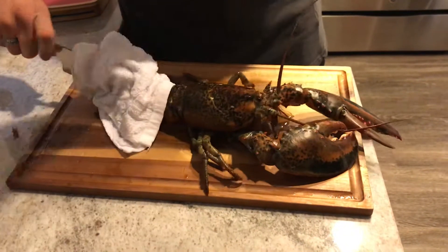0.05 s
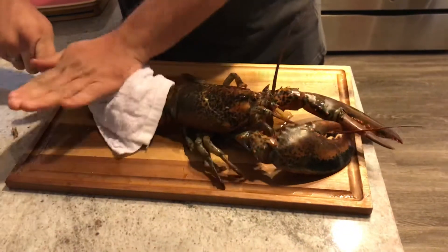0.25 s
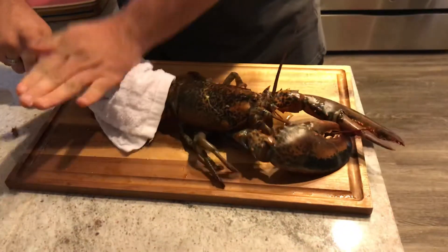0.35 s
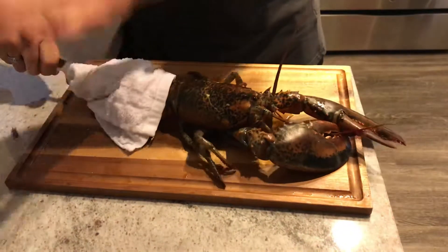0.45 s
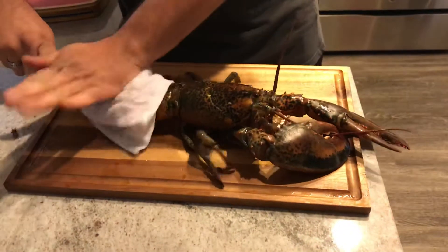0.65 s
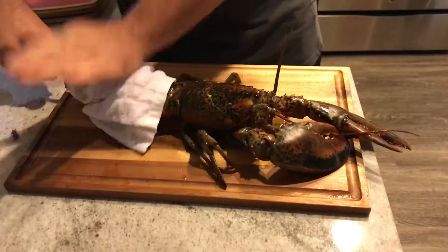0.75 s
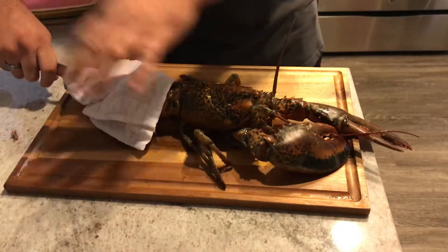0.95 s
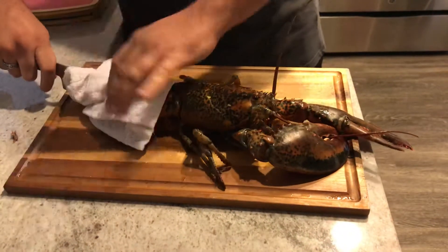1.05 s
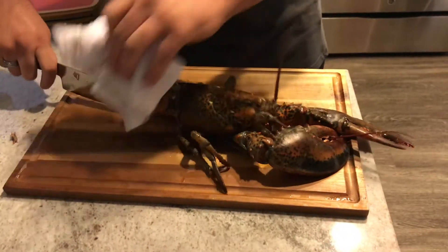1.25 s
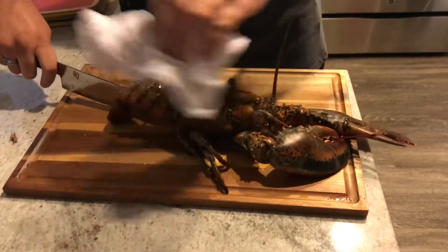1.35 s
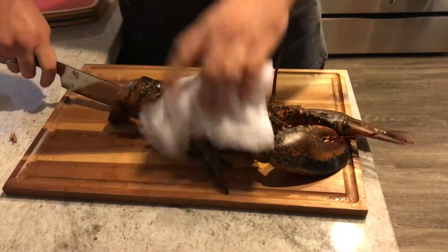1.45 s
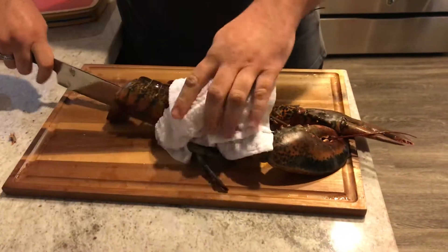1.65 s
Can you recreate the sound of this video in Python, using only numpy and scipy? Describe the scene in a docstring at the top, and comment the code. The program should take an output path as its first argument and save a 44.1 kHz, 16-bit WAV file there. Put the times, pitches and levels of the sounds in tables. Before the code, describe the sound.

Two sharp, crunching whacks drive a knife through lobster shell onto a wooden board.

```python
"""A palm twice whacks the back of a towel-covered knife, driving it through a lobster onto a board.
Each blow is a soft slap, a crunch of shell and a knock of wood; the second goes through and thumps
the counter harder. Then the towel is pulled off, and blade and shell tick.
The small kitchen echoes briefly over the low hum of an appliance."""
import sys
import numpy as np
from scipy import signal
from scipy.fft import rfft, irfft
from scipy.io import wavfile
from scipy.ndimage import uniform_filter1d

SR = 44100
rng = np.random.default_rng(int(sys.argv[2]) if len(sys.argv) > 2 else 0)


def wav_out(sig):
    """Save sig, one row per channel (or a flat mono array), as 16-bit PCM at SR to the path in sys.argv[1]."""
    wavfile.write(sys.argv[1], SR, np.round(np.clip(np.atleast_2d(sig).T, -1, 1) * 32767).astype(np.int16))


N = 74970
T = np.arange(N) / SR

# the blade drives into the board: (time [s], knock [dB], contact time [s], counter thump [dB])
KNOCKS = [(0.2331, -19, 0.00032, -36.5), (0.7091, -26.5, 0.00024, -25)]


def from_db(db):
    """Turn decibels into a number to multiply by."""
    return 10 ** (np.asarray(db) / 20)


def unit_power(x):
    """Scale a sound so that its average power is one."""
    return x / np.sqrt(np.mean(x ** 2) + 1e-20)


def at_hz(points, hz):
    """Read between the rows of a table, with octaves evenly spaced."""
    freqs, values = np.transpose(points)
    return np.interp(np.log(np.maximum(hz, 1)), np.log(freqs), values)


def colour(x, spectrum, tilt_db=0):
    """Even out a noise, then give it a tone colour; a positive tilt makes it brighter."""
    size, even_over_hz = 4096, 300
    hz = np.maximum(np.fft.rfftfreq(size, 1 / SR), 10)
    smoothed = uniform_filter1d(np.abs(rfft(x)) ** 2, int(even_over_hz * len(x) / SR))
    own_power = np.interp(hz, np.fft.rfftfreq(len(x), 1 / SR), smoothed)
    wanted_db = at_hz(spectrum, hz) + tilt_db * np.log2(np.maximum(hz, spectrum[1][0]))
    gain = from_db(wanted_db) / np.sqrt(own_power + 1e-12)
    # a minimum-phase filter, so nothing sounds ahead of a hit
    cepstrum = irfft(np.log(gain))
    cepstrum[1:size // 2] *= 2
    cepstrum[size // 2 + 1:] = 0
    return signal.fftconvolve(x, irfft(np.exp(rfft(cepstrum))))[:len(x)]


def bursts(events, spectrum, per_s, spread_db):
    """Each event is a swarm of tiny snaps that swells and dies away."""
    size = 24576
    out, age = np.zeros(N + size), np.arange(size) / SR
    for time, db, rise, decay, tilt_db in events:
        signs = rng.choice([-1, 1], size)
        strengths = signs * from_db(spread_db * np.minimum(rng.exponential(1, size), 4))
        snaps = (rng.random(size) < per_s / SR) * strengths
        swell = np.minimum(age / rise, 1) * np.exp(-np.clip((age - rise) / decay, 0, 20))
        burst = unit_power(colour(snaps * swell, spectrum, tilt_db))
        start = int(time * SR)
        out[start:start + size] += from_db(db) * np.sqrt(np.mean(swell ** 2)) * burst
    return out[:N]


def ring(tones, time, contact_s):
    """A struck object sounds its own tones; each falls by 60 dB over its ring time."""
    age = np.maximum(T - time, 0)
    out = sum((-1) ** k * from_db(db - 60 * age / ring_s) * np.sin(2 * np.pi * hz * age)
              for k, (hz, db, ring_s) in enumerate(tones))
    return out * (1 - np.exp(-age / contact_s))


def tap(tones, touches):
    """Light, hard touches set an object ringing."""
    return sum(from_db(db) * ring(tones, time, contact_s=0.00043) for time, db in touches)


def background():
    """Room air, the hum of an appliance and a thin hiss that fades out."""
    # hum tones, and the colours of hiss and air: (frequency [Hz], level [dB])
    hum_tones = [(59.2, -62), (174, -67.5), (355.5, -62.5)]
    hiss_colour = [(3500, -30), (4200, -2.5), (4550, -2.5), (5300, -31)]
    air_colour = [(15, -9.5), (25, -11), (76, 0), (123, -6), (200, -2.5), (309, -4), (363, -6), (489, -13),
                  (575, -14), (1190, -12.5), (1370, -17), (1560, -16.5), (2990, -22), (4370, -21.5),
                  (4870, -26.5), (11600, -33), (16000, -31)]
    hiss_db, hiss_fade_s, air_db = -67.5, 0.18, -57
    hum = sum(from_db(db) * np.sqrt(2) * np.sin(2 * np.pi * (hz * T + rng.random()))
              for hz, db in hum_tones)
    hiss = unit_power(colour(rng.standard_normal(N), hiss_colour)) * np.exp(-T / hiss_fade_s)
    air = unit_power(colour(rng.standard_normal(N), air_colour))
    return hum + from_db(hiss_db) * hiss + from_db(air_db) * air


def kitchen(x):
    """Sound bounces off counter and cupboards, then blurs into an echo that lasts longest in the bass."""
    # colours of the first bounces and of the echo's tail: (frequency [Hz], level [dB])
    early_colour = [(100, -9.5), (400, 5), (1200, 2), (5000, -4), (15000, -3)]
    tail_colour = [(60, -2), (150, 0), (300, 0), (600, -3.5), (1000, -6), (2000, -4), (4000, -6),
                   (6500, -11), (10000, -13), (15000, -15)]
    # how long the tail lasts: (frequency [Hz], ring time [s])
    ring_times = [(100, 0.65), (400, 0.46), (1200, 0.53), (3000, 0.38), (6000, 0.47), (10000, 0.36),
                  (15000, 0.44)]
    delay_s, build_s = 0.00075, 0.0024
    early_db, early_decay_s, early_per_s = -8.5, 0.022, 2500
    age = np.maximum(T - delay_s, 0)
    edges_hz = np.geomspace(45, 17000, 18)
    noise, response = rng.choice([-1., 1.], (2, N)), np.zeros(N)
    for k, (low, high) in enumerate(zip(edges_hz, edges_hz[1:])):
        hz = np.sqrt(low * high)
        band = signal.sosfilt(signal.butter(2, [low, high], "band", fs=SR, output="sos"), noise[k % 2])
        power = uniform_filter1d(band ** 2, int(SR * max(.006, 3 / (high - low))))
        steady = band / np.sqrt(np.abs(power) + 1e-12)
        tail = steady * from_db(-60 * age / at_hz(ring_times, hz)) * (1 - np.exp(-age / build_s))
        band_share = np.sqrt(2 * (high - low) / SR / N)
        response += from_db(at_hz(tail_colour, hz)) * unit_power(tail) * band_share
    bounces = rng.standard_normal(N) * (rng.random(N) < early_per_s / SR) * (age > 0)
    early = colour(bounces * np.exp(-age / early_decay_s), early_colour)
    response += from_db(early_db) * unit_power(early) / np.sqrt(N)
    return signal.fftconvolve(x, response)[:N]


def rubbing():
    """The towel slides, and loose shell scuffs on the board."""
    # each rub: (time [s], level [dB], rise [s], decay [s], tilt [dB/octave])
    rustles = [(.1, -61, 0.059, 0.013, 2), (.44, -57, 0.0074, 0.13, 3), (.93, -64.5, 0.1, 0.14, 14),
               (1.32, -53, 0.031, 0.037, 0), (1.395, -51, 0.049, 0.018, 1.9)]
    scuffs = [(1.273, -48, 0.015, 0.0085, 3), (1.34, -59, 0.013, 0.012, 7),
              (1.55, -52.5, 0.018, 0.0089, -1.5)]
    # their colours: (frequency [Hz], level [dB])
    cloth_colour = [(150, -7.5), (500, 4), (1000, 0), (2200, 6.5), (4000, -4.5), (8000, -6), (13000, -16.5),
                    (16000, -16)]
    scuff_colour = [(150, -21), (550, 5), (850, 3), (1100, 6), (1600, 1), (3000, -15), (8000, -12),
                    (15000, -28)]
    return sum(bursts(events, spectrum, per_s=6000, spread_db=3.5)
               for events, spectrum in [(rustles, cloth_colour), (scuffs, scuff_colour)])


def ticking():
    """Blade and shell tick, and the hollow tail snaps as the towel comes off."""
    # each click: (time [s], level [dB], rise [s], decay [s], tilt [dB/octave])
    ticks = [(.371, -36.5, 0.00023, 0.0022, 2), (.669, -45, 0.00057, 0.0097, 4),
             (1.209, -45, 0.00057, 0.0038, 2.2), (1.2665, -47.5, 0.00055, 0.0041, -1),
             (1.279, -41, 0.00063, 0.0014, -4), (1.295, -39.5, 0.0007, 0.0057, -0.5),
             (1.3695, -43, 0.00086, 0.0016, 2), (1.3787, -52, 0.00036, 0.0011, 6),
             (1.4095, -51, .0005, .0015, 5), (1.441, -44, 0.0011, 0.0011, 3.5),
             (1.4515, -56, .0004, .001, 18), (1.5375, -48, 0.00037, 0.0026, -4),
             (1.5715, -49, 0.00043, 0.0014, 4.5), (1.5795, -35, 0.00033, 0.0013, -0.8),
             (1.649, -57.5, 0.00065, 0.0016, 3)]
    snaps = [(1.2942, -22.5, 0.0001, 0.00058, 1.5)]
    # their colours: (frequency [Hz], level [dB])
    tick_colour = [(200, -22), (750, 0.5), (1050, 12.5), (1700, 7.5), (2200, 5.5), (3000, 8.5), (6000, 0),
                   (9500, 0.5), (13000, -9.5), (16000, -2.5)]
    snap_colour = [(300, -32), (1000, -9), (4000, -0.5), (9300, -2), (10600, -12), (11600, 6), (12800, 5.5),
                   (14000, -2), (15500, -12)]
    return sum(bursts(events, spectrum, per_s=17000, spread_db=0.5)
               for events, spectrum in [(ticks, tick_colour), (snaps, snap_colour)])


def rocking_lobster():
    """The hollow shell rings, thin legs click against the body and the lobster taps the board."""
    # how each part rings: (frequency [Hz], level [dB], ring time [s])
    shell_tones = [(1042, -2.5, 0.15), (1115, -5, 0.069), (1518, -1.5, 0.088), (1854, -4.5, 0.038),
                   (2136, -2, 0.057), (2240, 1, 0.03), (2850, -5, 0.12), (3420, -11, 0.042),
                   (3990, 4.5, 0.039), (6300, 3, 0.03)]
    leg_tones = [(3190, -3, 0.02), (3400, -1.5, 0.024), (9130, -3.5, 0.023)]
    wood_tones = [(835, -2.5, 0.02), (991, 2, 0.033), (1270, 2, 0.023), (1460, -4, .02)]
    # when each is touched: (time [s], level [dB])
    shell_touches = [(1.2102, -67), (1.279, -56), (1.296, -43.5), (1.443, -56)]
    leg_touches = [(1.346, -48), (1.3684, -43)]
    wood_touches = [(1.2095, -54), (1.539, -64), (1.5465, -51), (1.5635, -50.5), (1.582, -53)]
    return tap(shell_tones, shell_touches) + tap(leg_tones, leg_touches) + tap(wood_tones, wood_touches)


def blade():
    """The steel rings faintly just before the second blow, then louder with it."""
    # the blade's ring: (frequency [Hz], level [dB], ring time [s])
    tones = [(961, 3, 0.26), (1098, -1.5, 0.12), (2250, -24, 0.21), (3000, -11, 0.22), (3820, -12, 0.16),
             (5640, -21, .13), (6150, -8.5, 0.19), (6550, 2.5, 0.048)]
    # what sets it off: (time [s], level [dB])
    touches = [(.669, -60.5), (0.7142, -34.5)]
    return tap(tones, touches)


def counter():
    """The counter booms under the board, which passes on each blow as a slower push."""
    # the counter's ring: (frequency [Hz], level [dB], ring time [s])
    tones = [(59.4, -2, 0.55), (89.1, -3.5, 0.42), (108, -6.5, 0.37), (150.9, -14, 0.5), (175.3, -12, 0.56),
             (209.2, -8, 0.42)]
    return sum(from_db(db) * ring(tones, time, contact_s=0.0047) for time, _, _, db in KNOCKS)


def board():
    """The wood knocks under the blade."""
    # the board's ring: (frequency [Hz], level [dB], ring time [s])
    tones = [(272.3, -13, 0.32), (307.3, -9, 0.19), (343, -7.5, 0.18), (398, -16.5, 0.074),
             (461, -8.5, 0.11), (533, -12.5, 0.091), (671.4, -8.5, .13), (732, -5, 0.0773),
             (870, -13, 0.137), (921, -19.5, 0.58), (1216, 3.5, 0.04), (1378, 2, 0.09), (1727, -7, 0.058),
             (3940, -20, 0.049), (4860, -7.5, 0.035)]
    return sum(from_db(db) * ring(tones, time, contact_s) for time, db, contact_s, _ in KNOCKS)


def blows():
    """The palm slaps the towel, then the shell gives way under the blade in many tiny cracks."""
    # each slap and crunch: (time [s], level [dB], rise [s], decay [s], tilt [dB/octave])
    slaps = [(.2098, -48, 0.0011, .003, 1), (.2188, -19.5, 0.0016, 0.0021, -0.5),
             (.7005, -21, 0.00035, 0.0024, 3.5)]
    crunches = [(0.2288, -17, 0.0011, 0.0089, 3.5), (0.231, -6, 0.0018, 0.0013, 0.35),
                (0.234, -9.5, 0.00057, 0.0013, 0.5), (0.2349, -19, 0.00081, 0.0043, -4.5),
                (0.24, -28, 0.0035, 0.002, 3.5), (0.2481, -22.5, 0.0005, 0.0036, 5),
                (0.283, -24, 0.0046, 0.0084, -1), (0.7079, -12.5, 0.00018, 0.0031, -0.2),
                (0.712, -14, 0.0022, 0.0011, 1.5)]
    # colours of the palm, the whole shell and the split shell: (frequency [Hz], level [dB])
    palm = [(100, -16.5), (300, 8), (520, -5), (950, 7.5), (1450, -2.5), (2000, -7.5), (3100, 4),
            (4500, -8.5), (6000, -5.5), (10000, -17), (15500, -13)]
    whole_shell = [(100, -18.5), (250, -2.5), (500, 1), (720, 6), (1080, 4), (1260, 11.5), (1530, 2),
                   (1750, 3.5), (2150, 1.5), (2500, -2.5), (3300, -1.5), (3950, 0.5), (4450, -1),
                   (5000, 1.5), (6200, -4), (8000, -5.5), (10000, -9.5), (15500, -11.5)]
    split_shell = [(100, 2.5), (250, -0.5), (450, -1), (580, -0.5), (730, 3), (850, 2), (1050, 9),
                   (1370, 5), (1620, 1.5), (1880, 4.5), (2200, -2.5), (2720, 0.5), (3800, -2), (4800, -5),
                   (6100, 0), (7200, -5), (9000, -4), (11500, -12), (15500, -15)]
    between_blows_s = .5
    first = [row for row in crunches if row[0] < between_blows_s]
    second = [row for row in crunches if row[0] >= between_blows_s]
    return sum(bursts(events, spectrum, per_s=14000, spread_db=2.0)
               for events, spectrum in [(slaps, palm), (first, whole_shell), (second, split_shell)])


def scene():
    """The blows, ringing wood and steel, and small handling sounds, all in the kitchen."""
    ringing_echo_db, handling_echo_db, directions = -9, -2.5, 4
    crunch = blows()
    ringing = board() + blade()
    handling = ticking() + rubbing() + rocking_lobster()
    # a crunch sounds different in each direction, and each direction has its own echo
    echo = sum(kitchen(blows()) for _ in range(directions)) / np.sqrt(directions)
    echo += kitchen(from_db(ringing_echo_db) * ringing + from_db(handling_echo_db) * handling)
    return (crunch + ringing + counter() + handling + echo + background())[None]


def record(dry):
    """Round off the loudest peaks and cut the highest treble."""
    ceiling, cutoff_hz = 1.2, 16000
    rounded = ceiling * np.tanh(dry / ceiling)
    return signal.sosfilt(signal.ellip(10, .2, 80, cutoff_hz, fs=SR, output="sos"), rounded)


dry = scene()
out = record(dry)
wav_out(out)
```